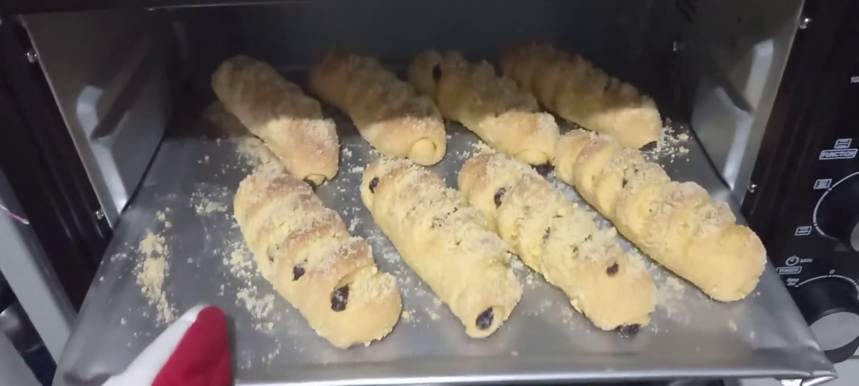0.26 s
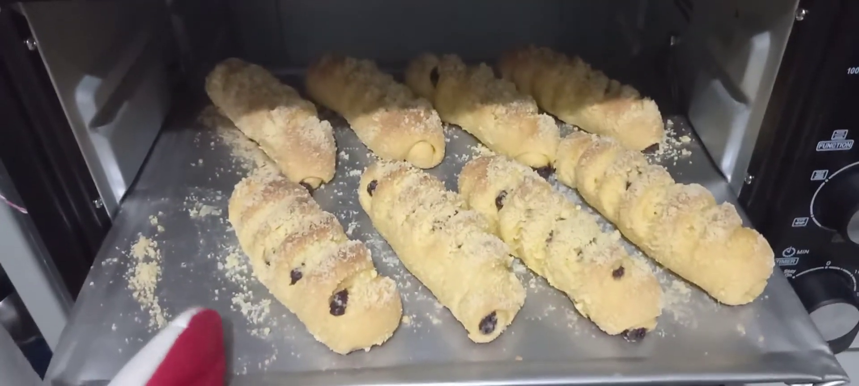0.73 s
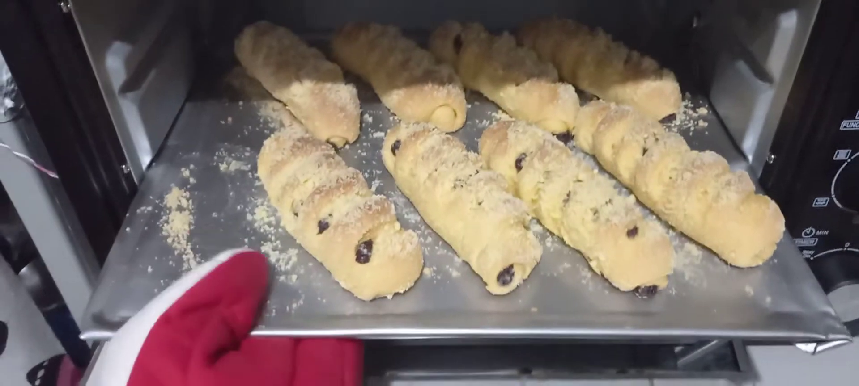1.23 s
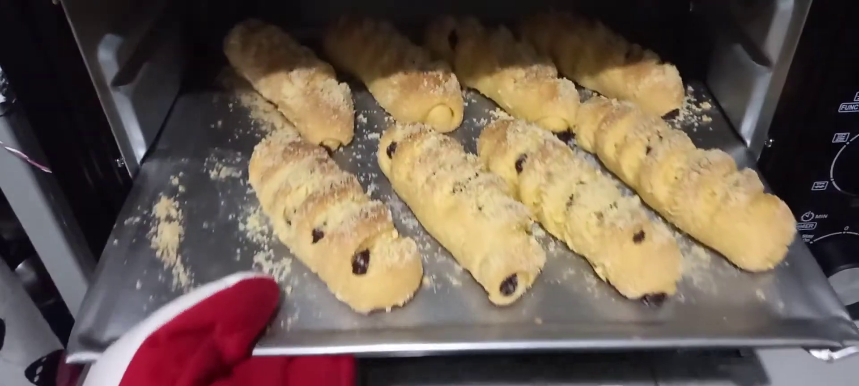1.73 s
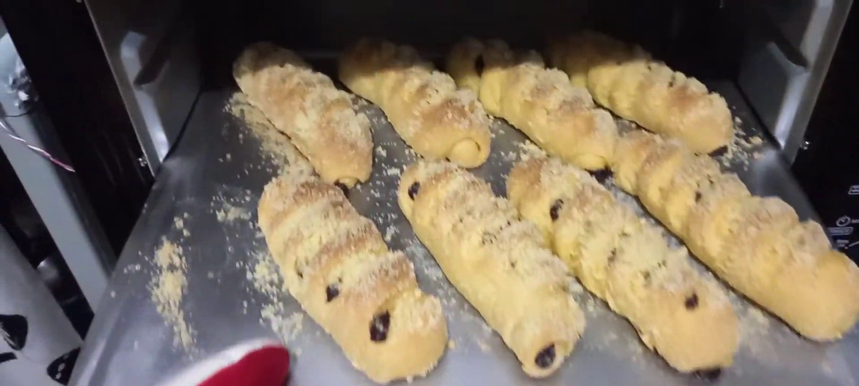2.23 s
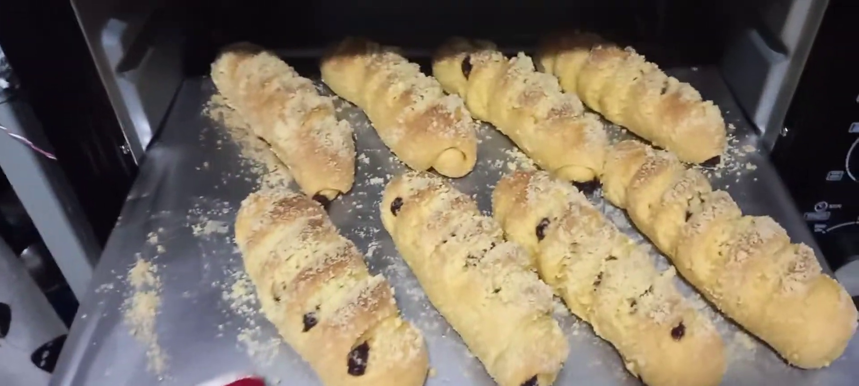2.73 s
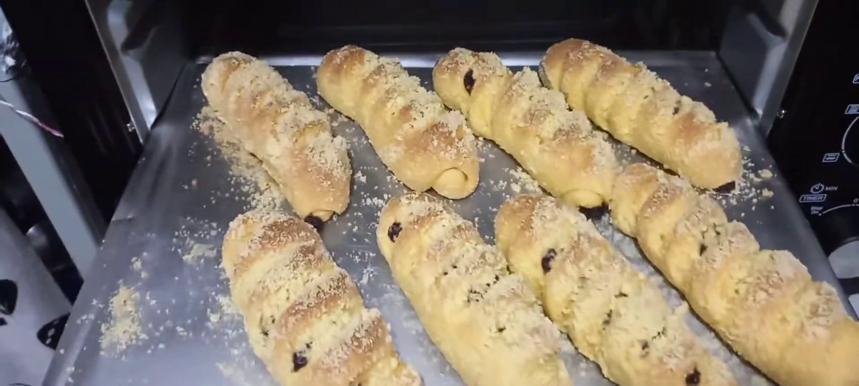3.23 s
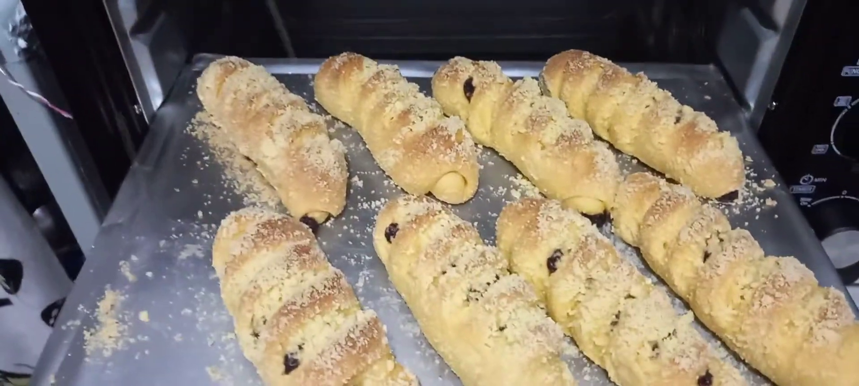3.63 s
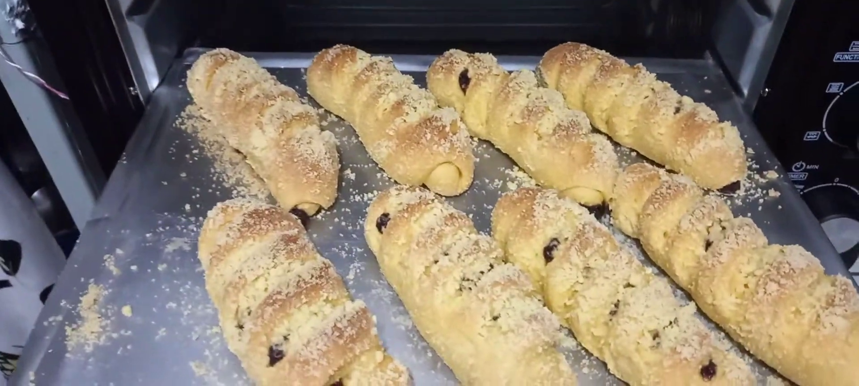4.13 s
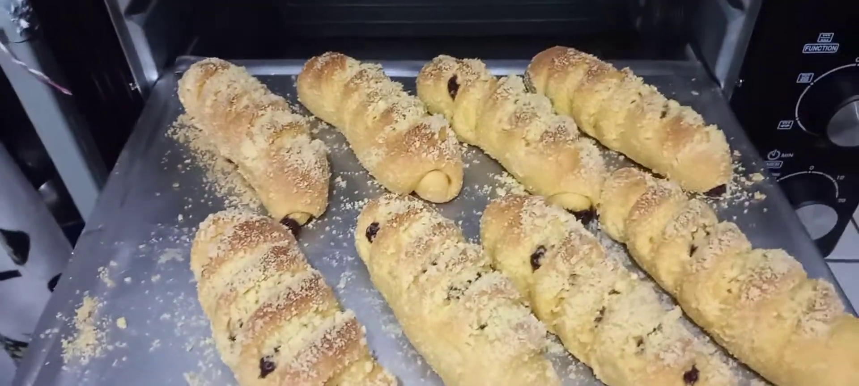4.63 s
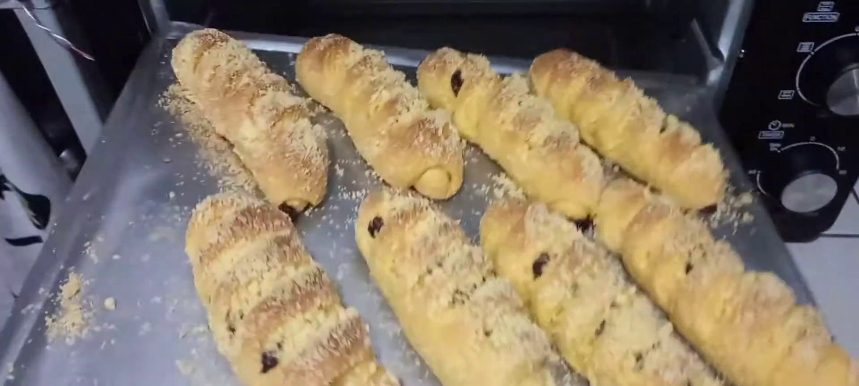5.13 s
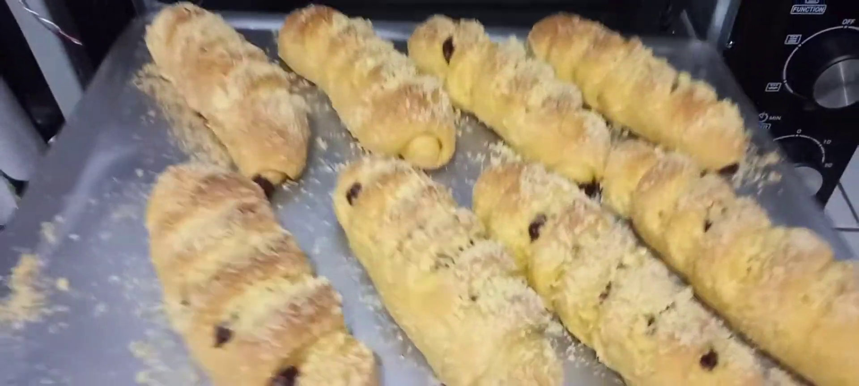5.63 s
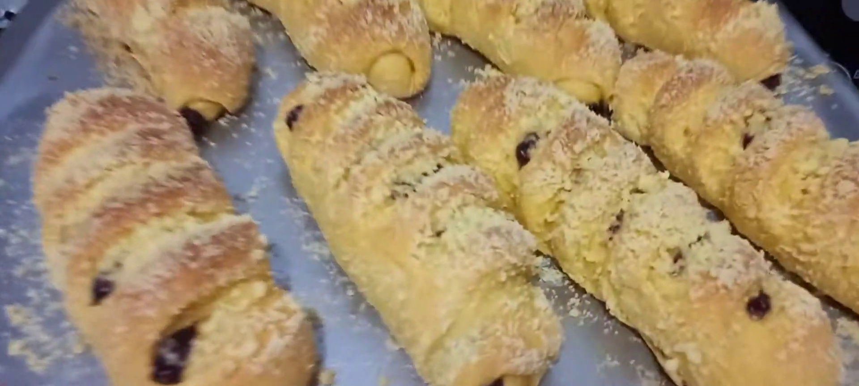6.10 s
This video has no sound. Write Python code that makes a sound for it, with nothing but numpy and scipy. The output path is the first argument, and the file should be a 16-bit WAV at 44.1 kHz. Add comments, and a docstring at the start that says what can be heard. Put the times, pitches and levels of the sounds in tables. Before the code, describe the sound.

Close to a small oven, a baking tray is dragged over a wire rack in short, gritty scrapes. About three seconds in, it knocks against the rack with loud, ringing sheet-metal clanks and small rattles, and it scrapes and clanks again near five seconds. Faint, even timer ticks and quiet kitchen air lie underneath, while the hand holding the microphone adds low thumps and rumble on the right.

```python
"""A quiet kitchen, close to a small oven, heard through the two microphones of a hand-held phone.
The oven's clockwork timer ticks over the room air. A baking tray is dragged out: it scrapes along the
wire rack in stick-slip strokes and clanks against it, ringing in its sheet-metal modes.
The hand shifts its grip, which only the right microphone feels, as low thumps and rumble.
Around 4 s the phone comes closer and the hand cups it, colouring the sound."""
import sys
import numpy as np
from scipy import signal
from scipy.io import wavfile
from scipy.ndimage import uniform_filter1d

SR = 44100
rng = np.random.default_rng(int(sys.argv[2]) if len(sys.argv) > 2 else 0)


def file_out(sig):
    """Save sig as 16-bit WAV at sys.argv[1]."""
    # one column per channel
    cols = np.atleast_2d(sig).T
    # limit, then scale
    lim = np.clip(cols, -1, 1)
    pcm = np.round(lim * 32767).astype(np.int16)
    wavfile.write(sys.argv[1], SR, pcm)


N = 280476

# the tray's strong modes: pitch_hz, level_db, t60_s
TRAY_MODES = [(268, -8.5, 0.5), (364.4, -3.5, 0.28), (404.5, -12, 0.55), (444, -4.5, 0.32),
              (478.5, -3.5, 0.28), (524, -5, 0.37), (573, -2.5, 0.19), (603, -3, 0.24), (638, -5.5, 0.16),
              (760, -10.5, 0.29), (821, -9, 0.22), (988.7, -6.5, 0.084), (1253, -19.5, 0.051),
              (1980, -13.5, 0.15), (2327, -16.5, 0.05), (2862, -14.5, 0.085), (3490, -7, 0.044)]
# how alike ringing metal is at the two microphones: frequency_hz, correlation
METAL_LIKENESS = [(60, 1), (400, .93), (1000, 1), (3000, 0.034), (10000, 0.1)]


def amp(db):
    """Decibels to amplitude."""
    return 10 ** (np.asarray(db) / 20)


def unit_rms(x):
    """Scales a signal to an RMS of one."""
    return x / np.sqrt(np.mean(x ** 2) + 1e-20)


def wander(length, depth_db, span):
    """A gain that drifts at random, smoothed over span samples."""
    return amp(depth_db * unit_rms(uniform_filter1d(rng.standard_normal(length), span)))


def curve(points, hz, column=1):
    """Joins table rows by straight lines on a log-frequency axis."""
    table = np.array(points, float)
    return np.interp(np.log(hz + 1), np.log(table[:, 0] + 1), table[:, column])


def add(mix, start_s, sound):
    """Mixes a sound in from start_s on."""
    part = mix[..., max(round(start_s * SR), 0):][..., :sound.shape[-1]]
    part += sound[..., :part.shape[-1]]


def colour(x, points, column=1, size=4096):
    """Minimum-phase filter with the dB response of a table."""
    log_gain = np.log(amp(curve(points, abs(np.fft.fftfreq(size, 1 / SR)), column)))
    taps = np.fft.ifft(np.exp(np.conj(signal.hilbert(log_gain)))).real[:size // 2]
    return signal.oaconvolve(x, taps.reshape((1,) * (x.ndim - 1) + (-1,)), axes=-1)[..., :x.shape[-1]]


def noise_pair(length, likeness, shape_db, size):
    """Two partly alike noises; shape_db(hz, s) sets level over frequency and time."""
    frames, hz = length * 4 // size + 5, np.fft.rfftfreq(size, 1 / SR)[:, None]
    a, b, c, d = rng.standard_normal((frames, len(hz), 4)).T
    alike = np.clip(curve(likeness, hz), -1, 1)
    left = a + 1j * b
    right = alike * left + np.sqrt(1 - alike ** 2) * (c + 1j * d)
    spectra = np.array([left, right]) * amp(shape_db(hz, np.arange(frames) * size / 4 / SR))
    return signal.istft(spectra, nperseg=size, noverlap=size * 3 // 4)[1][:, :length] / np.sqrt(size)


def room_air(spectrum, level_db, balance):
    """Steady kitchen room tone with a slight flutter."""
    # how alike the air is at the two microphones: frequency_hz, correlation
    air_likeness = [(60, 0.6), (180, 1), (550, 0.18), (1650, -0.037), (4970, -0.44)]

    def shape_db(hz, s):
        side_db = curve(balance, hz) / 2
        return curve(spectrum, hz) + np.array([side_db, -side_db]) - abs(side_db) / 2

    flutter = wander(N, depth_db=.5, span=3000)
    return amp(level_db) * unit_rms(noise_pair(N, air_likeness, shape_db, size=1024)) * flutter


def timer():
    """The escapement clicks evenly; the oven's shell smears each click."""
    # one tick's spectrum: frequency_hz, density_db
    spectrum = [(150, -2.5), (300, 7), (700, -19), (1700, -14), (3000, -16), (4000, -21), (4800, -2.5),
                (5600, -15.5), (7000, -18.5), (10000, -18.5), (16000, -21)]
    # the ticking as the phone moves: time_s, level_db
    levels = [(0, -67.5), (1.5, -80), (1.9, -63.5), (2.3, -71), (3.2, -68.5), (4, -79), (5.5, -68.5),
              (6.36, -72.5)]
    first_s, period_s, t60_s = .1068, .2382, .24
    ticks, t = np.zeros((2, N)), np.arange(round(.23 * SR)) / SR
    attack = 1 - np.exp(-(t / .004) ** 2)
    for start_s in np.arange(first_s, N / SR, period_s):
        burst = noise_pair(len(t), METAL_LIKENESS, lambda hz, s: curve(spectrum, hz) - 60 * s / t60_s, 256)
        level_db = np.interp(start_s, *np.transpose(levels)) + 2 * rng.standard_normal()
        add(ticks, start_s, amp(level_db) * unit_rms(burst) * attack)
    return ticks


def finger_thump(level_db, length_s, crackle_db, crackle_s):
    """The phone's shell flexes for a few cycles that start fast and settle low, while skin crackles."""
    shell_hz = 69.5
    t = np.arange(round(2 * length_s * SR)) / SR
    force = amp(level_db)  # harder taps start higher and settle sooner
    cycles = shell_hz * t + (1.25 + .7 * force) * (1 - np.exp(-t / (.005 - .0042 * force)))
    swing = (1 - np.exp(-t / .0039)) * np.exp(-(t / (.74 * length_s)) ** 2.66)
    flex = swing * np.sin(2 * np.pi * cycles)
    snap = np.sin(2 * np.pi * 480 * t) * np.exp(-((t - .0013) / .00072) ** 2)
    snap *= amp(1 + 1.4 * level_db)  # a hard fingertip snaps far more than a soft one
    # rubbing skin: frequency_hz, gain_db
    skin = [(300, 26.5), (750, 14.5), (1500, 10.5), (4800, 8), (7000, -22), (15000, -2.5)]
    rub = t / (.22 * crackle_s)
    crackle = colour(rng.standard_normal(len(t)), skin) * rub * np.exp(1 - rub)
    return amp(crackle_db) * crackle - force * (flex + snap)


def handling_noise():
    """The grip shifts on the phone: a lumpy low rumble and finger thumps."""
    # rumble of the holding hand: time_s, level_db
    grip = [(0.0, -37.5), (0.37, -46.5), (0.65, -70.5), (1.15, -55), (1.61, -64.5), (1.82, -63),
            (2.3, -58.5), (2.48, -38), (3.38, -66.5), (3.58, -49), (4.06, -76), (4.44, -48), (4.9, -79),
            (5.38, -55), (5.95, -73), (6.36, -71.5)]
    # fingers tap the phone: start_s, level_db, length_s, crackle_db, crackle_s
    taps = [(0.067, -14, 0.051, -47, 0.012), (0.17, -10.5, 0.039, -44.5, 0.0074),
            (0.331, -17, 0.028, -53, 0.001), (1.268, -26.5, 0.022, -73, 0.0078),
            (1.9, -20.5, 0.034, -78, 0.018), (2.296, -26, 0.03, -77, 0.011),
            (2.394, -29.5, 0.23, -76, .008), (2.43, -21.5, 0.077, -61, 0.0038),
            (2.472, -5, 0.023, -34.5, 0.019), (2.52, -16, 0.04, -41, 0.023),
            (2.982, -12, 0.033, -42.5, 0.016), (4.162, -26.5, 0.034, -64, 0.0087),
            (4.429, -31, 0.099, -72, .008), (4.465, -11, 0.035, -44, 0.033),
            (4.506, -22, 0.041, -36, 0.026), (5.648, -29.5, 0.033, -56.5, 0.0055)]
    rumble = signal.sosfilt(signal.butter(2, [50, 140], "band", fs=SR, output="sos"), rng.standard_normal(N))
    grip_db = np.interp(np.arange(N) / SR, *np.transpose(grip))
    handling = amp(grip_db) * unit_rms(rumble) * wander(N, depth_db=2.8, span=1500)
    for start_s, *tap in taps:
        add(handling, start_s - .002, finger_thump(*tap))
    return handling


def contact_db(body_db, edge_db, tilt_db, hz):
    """Spectrum of tray meeting rack: the sheet's drive (body) plus the rim's tilted drive (edge)."""
    # how contact drives the sheet: frequency_hz, density_db
    body_drive = [(30, -18), (110, -2.5), (200, -5), (260, 4), (424, 2.5), (620, 0), (720, -3.5),
                  (1000, -6), (1500, -12.5), (3870, -36), (9800, -52)]
    # how it drives the rim on the wires: frequency_hz, density_db
    edge_drive = [(200, -42.5), (600, -26), (1300, -8), (2000, -8.5), (3600, -5.5), (5000, -4), (5800, -14),
                  (9800, -20.5), (16000, -19.5)]
    pivot_hz, tilt_octaves = 3870, 1.4
    octaves = np.clip(np.log2((hz + 1) / pivot_hz), -tilt_octaves, tilt_octaves)
    body = body_db + curve(body_drive, hz)
    edge = edge_db + curve(edge_drive, hz) + tilt_db * octaves
    return 10 * np.log10(amp(2 * body) + amp(2 * edge))


def resonance(hz, centre_hz, width_hz, peak_db):
    """Power response of one resonance."""
    return amp(2 * peak_db) / (1 + (2 * (hz - centre_hz) / width_hz) ** 2)


def tray_scrape(start_s, loudest_s, end_s, wire_hz, body_db, edge_db, tilt_db):
    """One stroke of uneven stick-slip grit and hiss, partly ringing the rack wires and the tray."""
    # rack wires under the tray: pitch_hz, width_hz, peak_db
    rack_wires = [(1040, 14, -1), (2700, 35, 1.5), (4500, 220, -1.5)]
    singing_wire = (wire_hz, wire_hz / 8, 8)
    length = round((end_s - start_s) * SR)

    def shape_db(hz, s):
        swell_db = np.interp(s + start_s, [start_s, loudest_s, end_s], [-16.5, 0, -16.5])
        wires = sum(resonance(hz, *wire) for wire in rack_wires + [singing_wire])
        sheet = sum(resonance(hz, mode_hz, 30, db + 6.5) for mode_hz, db, _ in TRAY_MODES)
        ring_db = 10 * np.log10(1 + wires + sheet)
        # the stroke catches now here, now there in the spectrum
        patches = uniform_filter1d(rng.standard_normal((len(s), len(hz))), size=5, axis=0)
        patch_db = 2.5 * unit_rms(uniform_filter1d(patches, size=5, axis=1)).T
        return swell_db + contact_db(body_db, edge_db, tilt_db, hz) + ring_db + patch_db - 30 * (hz < 200)

    slips = wander(length, depth_db=2, span=300) * signal.windows.tukey(length, .3)
    return noise_pair(length, METAL_LIKENESS, shape_db, size=1024) * slips


def weak_modes(t, damping):
    """Countless weak tray modes blur into ringing noise; the kitchen's tail sets its fastest decay."""
    # decay of the dense ringing: frequency_hz, t60_s
    decay = [(80, 0.21), (260, 0.89), (600, 0.73), (800, 0.43), (1840, 0.36), (4850, 0.29), (12800, 0.12)]
    room_db, room_t60_s, spacing_hz, spread_db = 5, .14, 40, 9

    def shape_db(hz, s):
        return np.maximum(-60 * damping * s / curve(decay, hz), room_db - 60 * s / room_t60_s)

    ringing = noise_pair(len(t), METAL_LIKENESS, shape_db, size=256)
    mode_hz = np.arange(100, 1300, spacing_hz)
    mode_db = spread_db * (rng.random(len(mode_hz)) - .55) * signal.windows.tukey(len(mode_hz), .2)
    return colour(ringing, np.c_[mode_hz, mode_db], size=8192)


def strong_modes(t, damping):
    """The tray's strong modes beat in pairs; each blow lands elsewhere and weakens them unevenly."""
    spot_db = 8
    modes = np.zeros((2, len(t)))
    for hz, db, t60_s in TRAY_MODES:
        spot, phase, split, skew = rng.random(4)
        envelope = amp(db - spot_db * spot - 60 * damping * t / t60_s)
        beat = 1 + .5 * np.cos(2 * np.pi * (phase + hz * .023 * split * t))
        modes += envelope * beat * np.sin(2 * np.pi * (hz * t + np.c_[[0, .15 * skew]]))
    return colour(modes, [(300, -5.5), (3000, 13.5)])  # levels the falling spectrum of the modes


def tray_clank(strike_s, body_db, edge_db, tilt_db):
    """The sheet flexes, then the rim cracks on the wire and rings. Returns start time and sound."""
    lead_s, silent_db, held_s = .0025, -200, 4
    t = np.arange(round((.8 if body_db > -25 else .4) * SR)) / SR
    damping = 1.35 if strike_s > held_s else 1  # gripped in the mitt, the tray dies away faster
    ringing = weak_modes(t, damping) + amp(-7) * strong_modes(t, damping)
    crack = rng.standard_normal(len(t)) * (1 - np.exp(-t / .00031)) * np.exp(-t / .001)
    crack *= amp(18 - 1.1 * abs(tilt_db))  # square blows crack hardest, dull or glancing ones less
    sheet = ringing * (1 - np.exp(-(t / .0046) ** 2))
    rim = ringing * (1 - np.exp(-t / .0021)) * (1 + 2.1 * np.exp(-t / .0024)) + crack
    hz = np.geomspace(30, SR / 2, 60)
    clank = colour(sheet, np.c_[hz, contact_db(body_db, silent_db, tilt_db, hz)])
    add(clank, lead_s, colour(rim, np.c_[hz, contact_db(silent_db, edge_db, tilt_db, hz)]))
    return strike_s - lead_s, clank


def phone_microphones(sound, near):
    """Each microphone has its own colour; the cupping hand adds more as near goes from 0 to 1."""
    # the open microphones: frequency_hz, left_db, right_db
    response = [(64, 8.5, 9), (655, -6.5, -6), (945, 0, 2.5), (1370, -0.5, 4), (1970, -1.5, 5.5),
                (2380, -4.5, 4.5), (5250, -12, -4), (6400, -4.5, -5), (9100, 2, -19), (9414, 9.5, -12.5),
                (10900, 4, -7.5), (14800, -4, -3)]
    # added by the cupping hand: frequency_hz, left_db, right_db
    cupping = [(300, -3, -2.1), (1003, -0.55, -0.5), (2254, -4.5, -3), (3500, -2.5, 4.5), (4800, -5, 10),
               (5700, -7, 10.5), (6200, 0.5, 4.5), (10100, -7, -1.5), (15000, -9, 5)]
    left = colour(sound[0], response, column=1)
    right = np.roll(colour(sound[1], response, column=2), 12)  # arrives 12 samples later
    cupped = np.array([colour(left, cupping, column=1), colour(right, cupping, column=2)])
    return (1 - near) * np.array([left, right]) + near * cupped


def scene():
    """Timer and tray as the phone hears them, with handling on the right and room air all round."""
    # the tray strikes the rack: strike_s, body_db, edge_db, tilt_db_per_octave
    blows = [(1.321, -47, -42, -3.5), (2.431, -41, -46, -4), (2.89, -6, -15, -11), (3.076, -31, -41.5, 8.5),
             (3.134, -40, -28.5, 0), (3.186, -35.5, -36.5, 5), (3.255, -42.5, -41, 10.5),
             (3.408, -1, -20.5, -5), (3.415, -46, -18, -2.5), (3.458, -11.5, -17.5, -1),
             (3.567, -28.5, -31.5, -1.5), (3.604, -31.5, -42, 3), (3.657, -36, -40.5, -1),
             (3.765, -50, -57.5, 7), (3.798, -52, -51, 4), (4.786, -37, -34, -4.5), (4.884, -31, -48.5, -1),
             (4.904, -34, -60.5, -4.5), (5.009, -32.5, -54.5, -4), (5.055, -32, -58, -15.5),
             (5.1362, -12, -9, -0.4), (5.173, -13, -40.5, 17.5), (5.286, -9, -11.5, -6)]
    # the tray drags: start_s, loudest_s, end_s, wire_hz, body_db, edge_db, tilt_db_per_octave
    strokes = [(0.807, 1.084, 1.2, 2000, -51, -56, 7), (1.298, 1.335, 1.41, 1800, -43, -43.5, 2.5),
               (1.585, 1.893, 1.96, 1940, -44.5, -48, 2.5), (1.872, 1.898, 2.09, 1890, -50, -37, 2),
               (1.898, 2.001, 2.12, 262, -35.5, -89, -5), (2.152, 2.349, 2.47, 2320, -39.5, -46, 2.5),
               (2.544, 2.561, 2.61, 3760, -49, -41, -2.5), (2.676, 2.804, 2.96, 3440, -47, -45.5, -3.5),
               (2.878, 3.123, 3.46, 3100, -37, -37, 1), (3.476, 3.575, 3.86, 3260, -58, -39, 2),
               (4.335, 4.356, 4.46, 345, -34.5, -54.5, -3.5), (4.538, 4.66, 4.8, 4700, -51.5, -49.5, 1.5),
               (4.719, 4.785, 4.87, 2400, -42, -41.5, -1.5), (4.804, 4.859, 5.0, 554, -34, -43.5, -3.5),
               (4.956, 5.07, 5.14, 2950, -43, -53, -4), (5.097, 5.123, 5.14, 4760, -60, -46, 0)]
    # the phone comes closer: time_s, near_share
    approach = [(3.901, 0.13), (4.501, 0.95)]
    # room air, far and near: (frequency_hz, density_db), level_db, (frequency_hz, left_minus_right_db)
    air_far = ([(43, -12), (118, 4.5), (154, -1.5), (330, 0.5), (491, -14), (590, -4.5), (673, -20),
                (948, -18), (1650, -20.5), (2390, -22), (5850, -39.5), (9650, -31), (16400, -40.5)],
                -62.5, [(60, 20.5), (200, 0), (2380, -3), (4400, 9.5), (8120, 15.5), (15000, 0)])
    air_near = ([(30, -30.5), (86, 2.5), (135, -20.5), (175, -15), (268, 3), (305, -14), (531, -15),
                 (710, -26), (1050, -23.5), (2580, -34), (4740, -27), (7030, -45), (12000, -47),
                 (16400, -41.5)], -61.5, [(60, -6), (110, 7), (200, -3), (1290, -0.5), (4400, -22.5),
                 (8120, -7.5), (15000, -7)])
    oven = timer()
    for blow in blows:
        add(oven, *tray_clank(*blow))
    for stroke in strokes:
        add(oven, stroke[0], tray_scrape(*stroke))
    near = np.interp(np.arange(N) / SR, *np.transpose(approach))
    mix = phone_microphones(oven, near)
    mix[1] += handling_noise()
    return mix + np.sqrt(1 - near) * room_air(*air_far) + np.sqrt(near) * room_air(*air_near)


def record(dry):
    """Microphone hiss, a bass cut, converter overload at the ceiling and the band limit."""
    hiss_hz, hiss_db, bass_cut_hz, ceiling, top_hz = 12500, -78, 40, .97, 16300
    white = rng.standard_normal(dry.shape)
    hiss = amp(hiss_db) * signal.sosfilt(signal.butter(4, hiss_hz, "high", fs=SR, output="sos"), white)
    thinned = signal.sosfilt(signal.butter(2, bass_cut_hz, "high", fs=SR, output="sos"), dry + hiss)
    clipped = np.clip(thinned, -ceiling, ceiling)
    band_limit = signal.firwin(511, top_hz, window=("kaiser", 9), fs=SR)
    return ceiling * signal.oaconvolve(clipped, band_limit[None], "same")


dry = scene()
out = record(dry)
file_out(out)
```